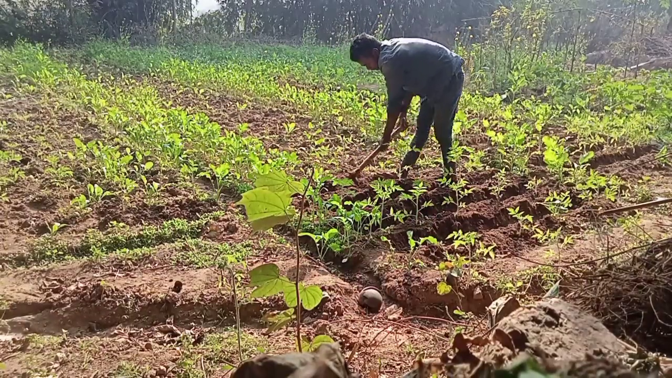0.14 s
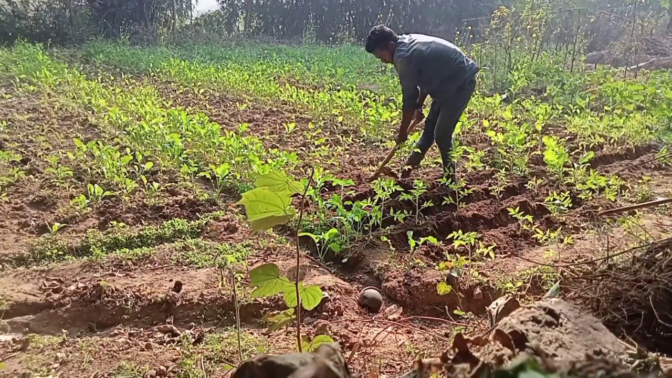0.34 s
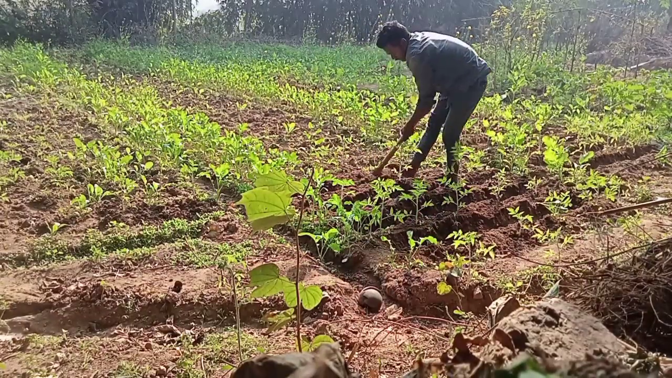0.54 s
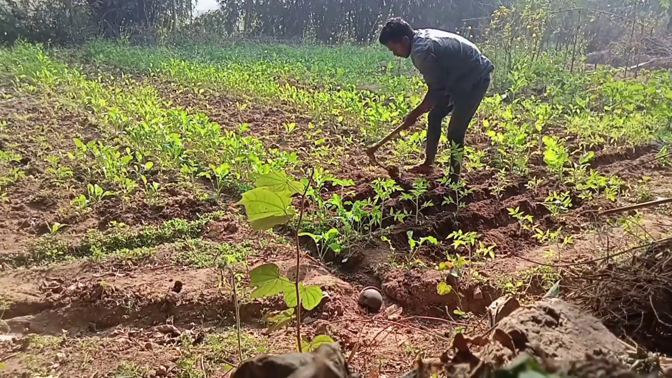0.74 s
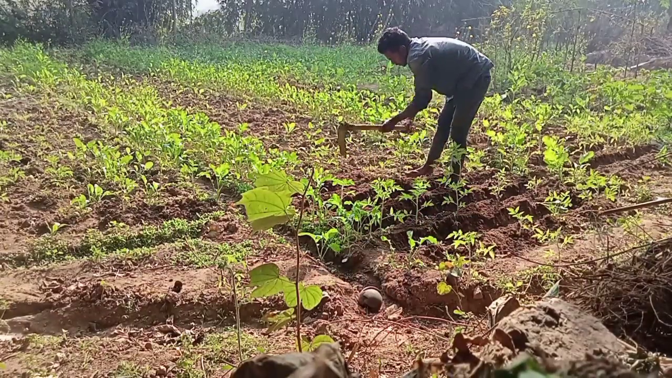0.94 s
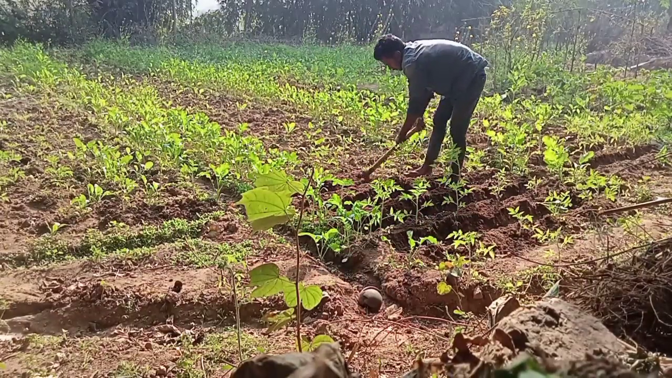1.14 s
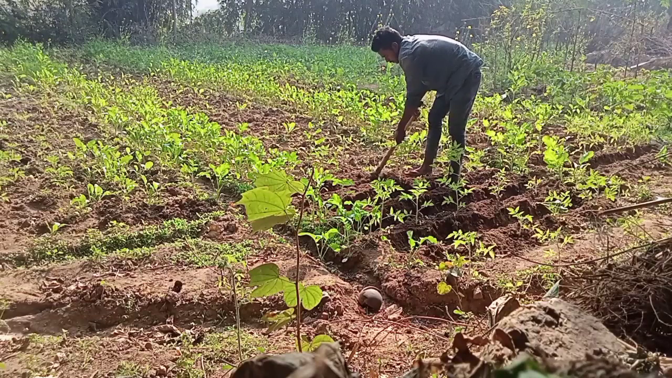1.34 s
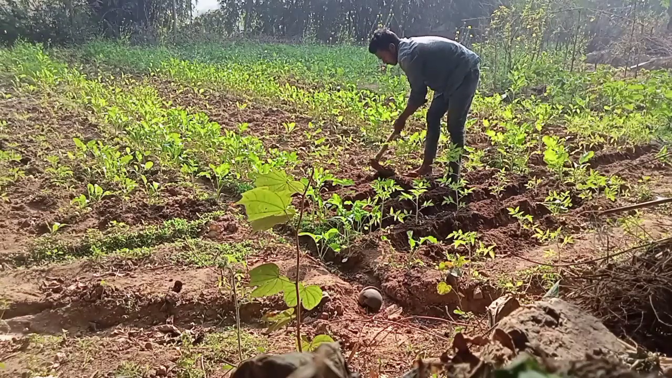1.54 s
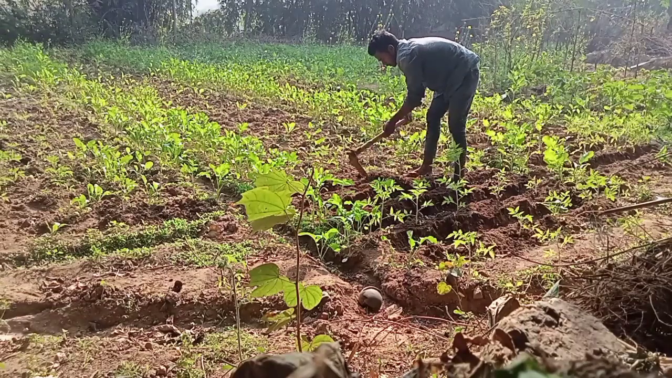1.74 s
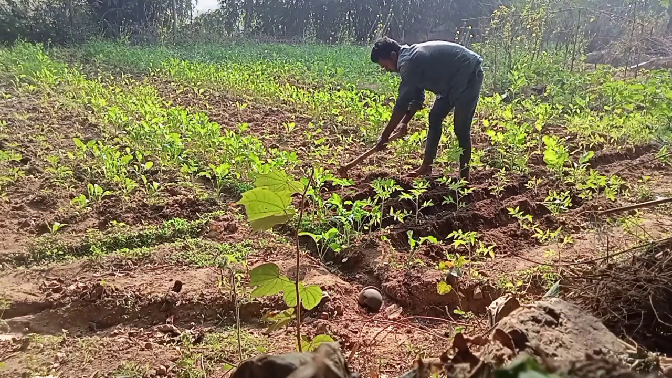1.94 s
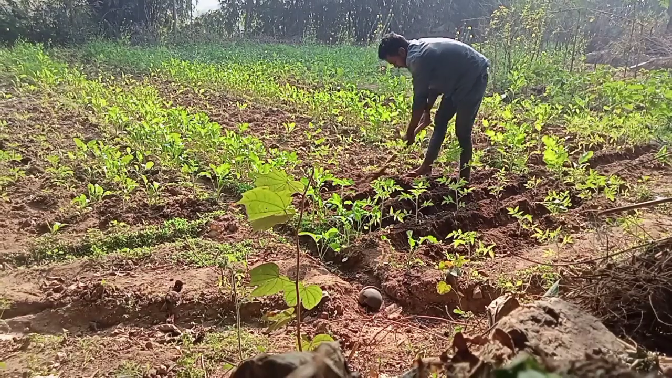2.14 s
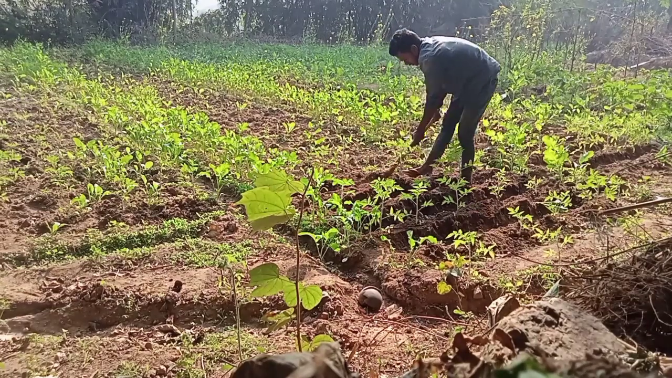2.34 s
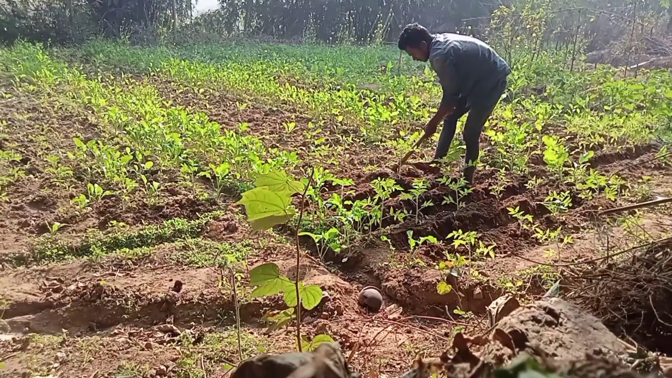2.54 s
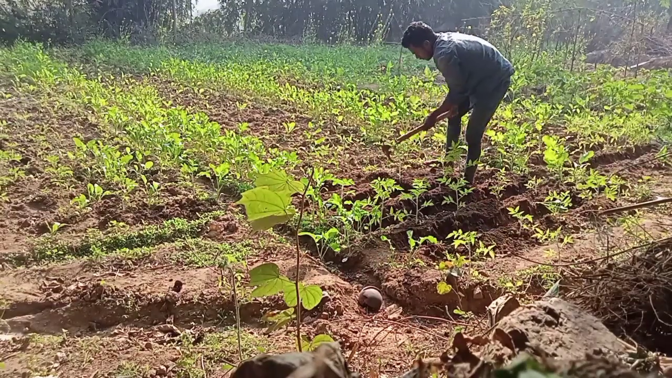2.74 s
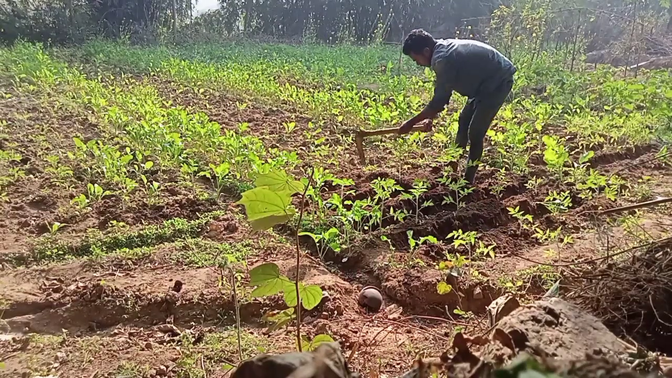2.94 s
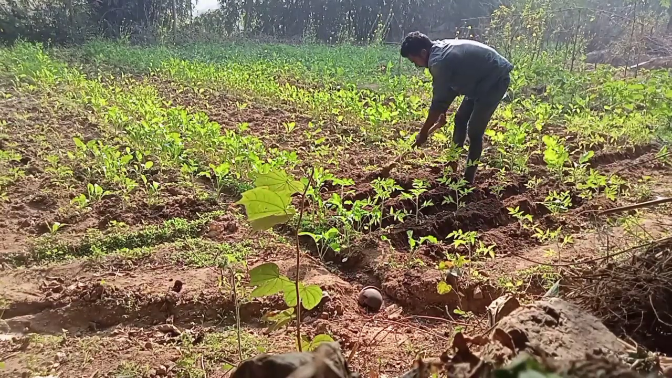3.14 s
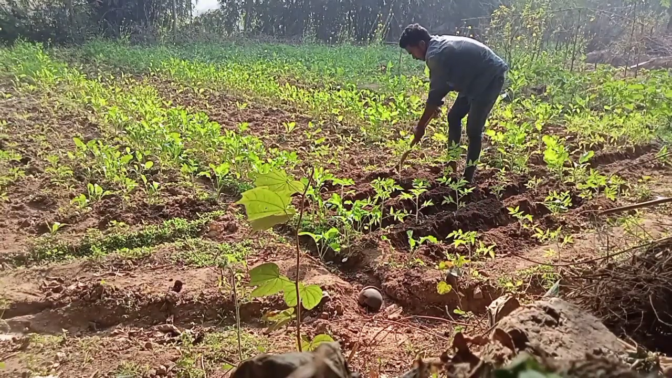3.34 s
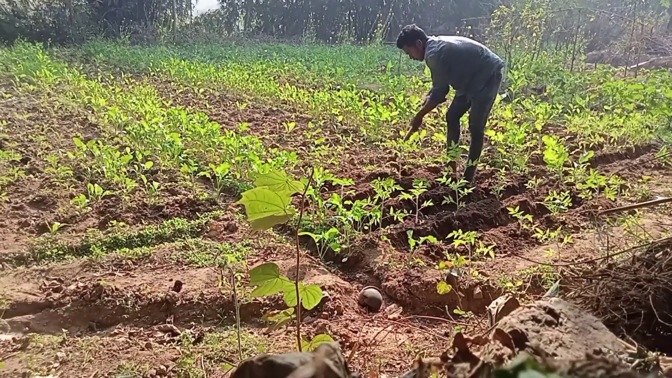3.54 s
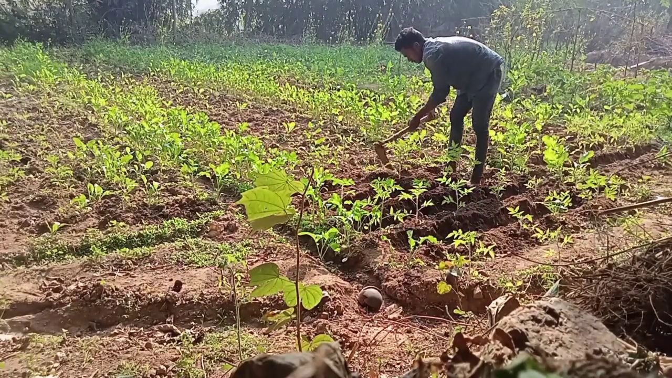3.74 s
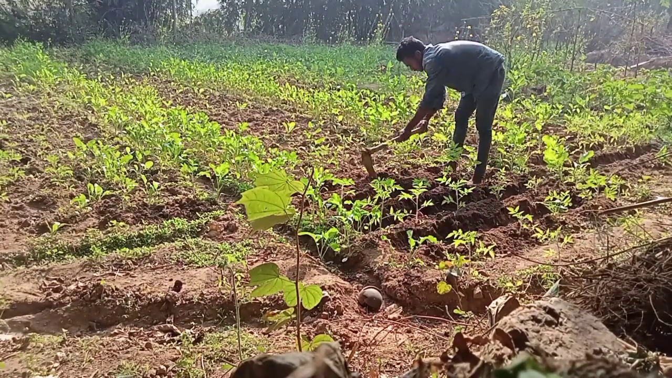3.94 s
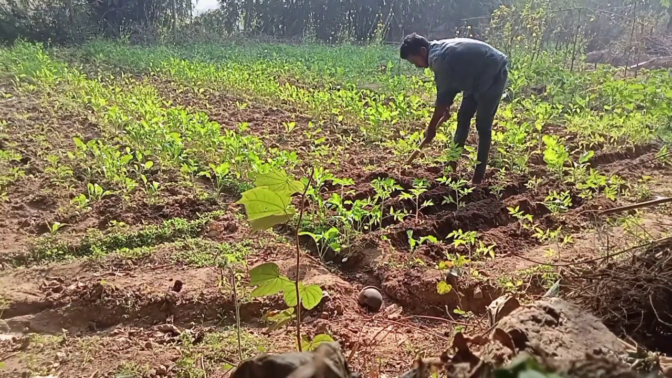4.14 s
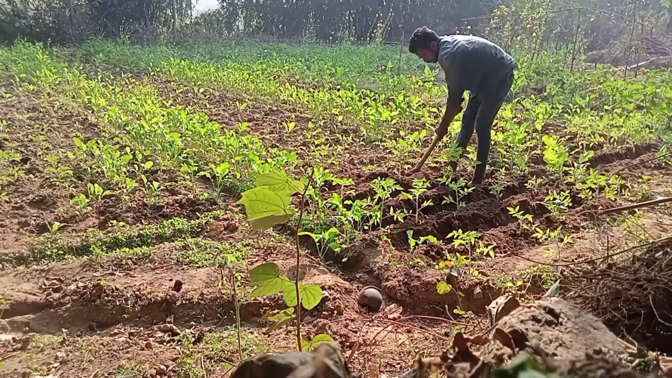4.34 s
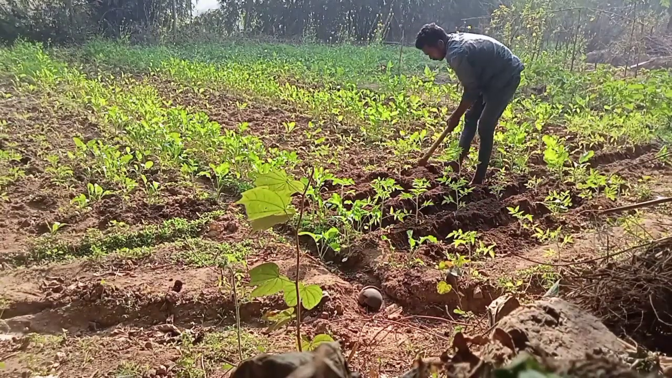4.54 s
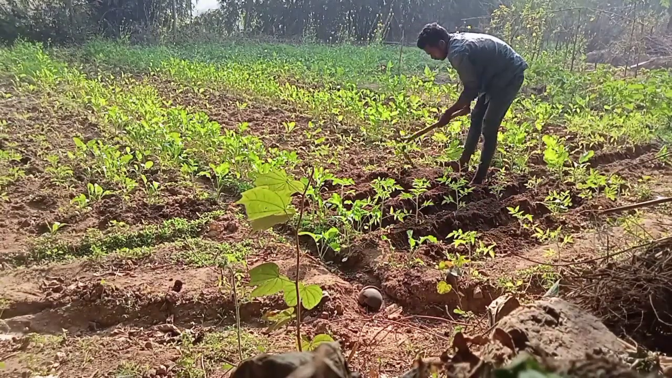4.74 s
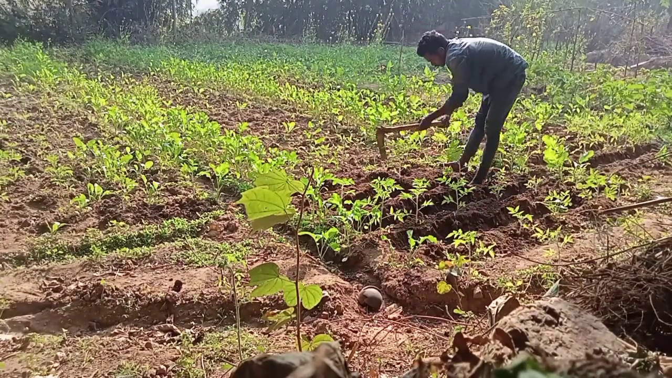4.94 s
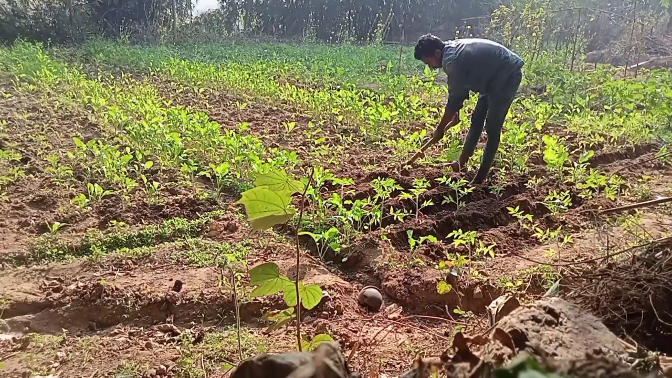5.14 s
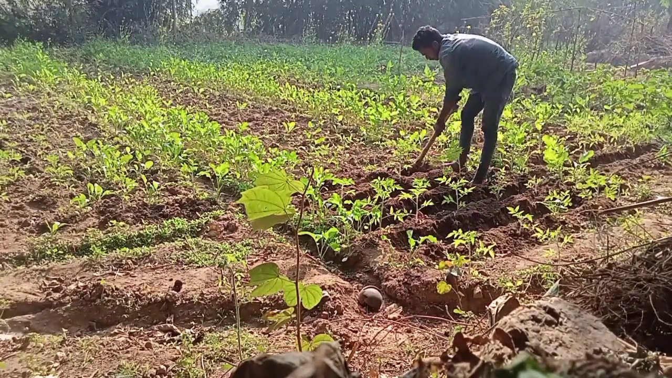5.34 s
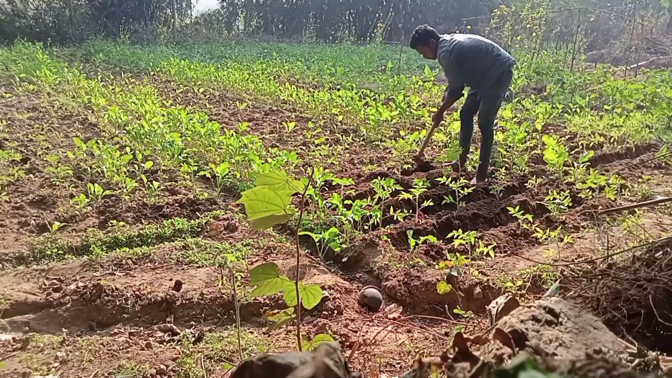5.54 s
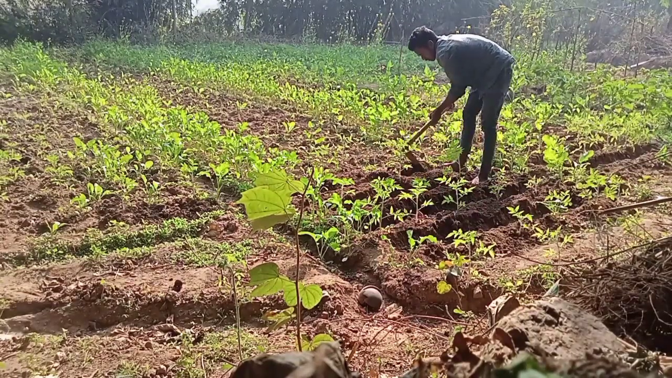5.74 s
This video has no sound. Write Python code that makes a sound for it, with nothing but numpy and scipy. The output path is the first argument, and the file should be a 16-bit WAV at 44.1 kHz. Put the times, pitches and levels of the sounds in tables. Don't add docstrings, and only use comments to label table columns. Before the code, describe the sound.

A phone microphone a few metres away hears a hoe working dry, stony soil in an open field. From 0 to 0.4 seconds the blade makes a long, rough, uneven drag with several thuds. A sharp chop lands near 1.2, a light, brighter double scrape at 2.05-2.2, a hard chop at 3.17, a chop and drag with much crumbling at 4.1-4.25, and a deep, bright, dusty chop at 5.17. Steel grates briefly, damped by earth; clods crumble and crumbs tick on stone. Crickets chirp in quick small phrases over cicada hiss and soft rumble. Faint birds whistle and chip: a sinking whistle at 0.55, a buzzy chip at 2.83. Leaves brush softly between strokes, longest around 3.95. A dove coos faintly from 4.3. Distant wooden knocks grow at 5.5, 5.7 and 5.8, beside a clear rising whistle at 5.7-5.8. Faint echoes return off trees.

```python
import sys
import numpy as np
from scipy import signal
from scipy.fft import rfft, irfft, next_fast_len
from scipy.io import wavfile
from scipy.ndimage import uniform_filter1d, map_coordinates

SR = 44100
rng = np.random.default_rng(int(sys.argv[2]) if len(sys.argv) > 2 else 0)


def magnitude_from_level(level_db):
    exponent = np.asarray(level_db, float) / 20
    return 10 ** exponent


def int16_out(signal):
    q = np.round(np.clip(np.atleast_2d(signal).T, -1, 1) * 32767)
    wavfile.write(sys.argv[1], SR, q.astype(np.int16))


N = 259749
T = np.arange(N) / SR

# (frequency [Hz], density [dB per Hz])
SPRAY = [(6000, -19), (9000, 19), (12000, -6), (14500, 10), (16000, 7)]
GRIT_DB, FIRM_DB = -4, -50
REST = 10 ** ((FIRM_DB + GRIT_DB) / 20)
LOW_MODES, UPPER_MODES, SOIL, DUST, CRUST, LOWEST_MODE, EDGE_MODE = range(7)


def unit(x):
    return x / np.sqrt(np.mean(x ** 2) + 1e-20)


def along(points, hz):
    f, v = np.transpose(points)
    return np.interp(np.log(hz + 1), np.log(f + 1), v)


def wobble(rate):
    coarse = T[::16]
    knots = rng.standard_normal(int(N * rate / SR) + 4)
    return np.interp(T, coarse, map_coordinates(knots, [coarse * rate]))


def filtered(x, response):
    m = next_fast_len(N + SR // 2)
    return irfft(rfft(x, m) * response(np.fft.rfftfreq(m, 1 / SR)), m)[:N]


def coloured(x, spectrum):
    return filtered(x, lambda hz: magnitude_from_level(along(spectrum, hz)))


def rush(spectrum, patchy_db):
    z = signal.stft(rng.standard_normal(N + 512), nperseg=512)[2]
    patches = uniform_filter1d(rng.standard_normal(z.shape), 6, 0)
    patches = unit(uniform_filter1d(patches, 14, 1))
    noise = signal.istft(z * magnitude_from_level(patchy_db * patches), nperseg=512)[1][:N]
    return unit(coloured(noise, spectrum))


def grit(per_second, spread_db):
    hit = rng.random(N) < per_second / SR
    size = magnitude_from_level(spread_db * np.minimum(rng.exponential(size=N), 3))
    return unit(hit * rng.standard_normal(N) * size)


def add(track, s, sound):
    place = track[round(s * SR):][:len(sound)]
    place += sound[:len(place)]


def air():
    # (time [s], level [dB])
    swell = [(0.0, -56.5), (0.75, -66.5), (1.28, -65), (1.82, -67), (2.18, -61.5), (2.36, -65), (4.02, -66),
             (4.26, -63), (4.67, -66.5), (5.89, -64.5)]
    # (frequency [Hz], density [dB per Hz])
    rumble_band = [(25, -16), (45, -0.5), (75, 8.5), (110, 7.5), (180, -2.5), (300, -11), (500, -44.5)]
    field_band = [(150, -5), (400, -0.5), (1000, -4.5), (2000, -6), (4000, -11), (6200, -17.5), (8500, -36),
                  (9500, -48), (11000, -72)]
    cicada_band = [(4100, -9), (4500, 6.5), (5000, -8), (6300, -12.5), (7200, 3.5), (8100, -1.5),
                   (9000, -17.5), (10000, -51)]
    hiss_band = [(6000, -39), (9000, 1.5), (12000, 2), (15000, 9), (16000, -3)]
    swell_db = np.interp(T, *np.transpose(swell))
    field_db = -69 + 0.96 * (swell_db - swell_db.mean())
    cicada_db = -76.5 + 1.2 * wobble(1.5) + 0.33 * wobble(13)
    rumble = magnitude_from_level(swell_db + 2.5 + 1.2 * wobble(9)) * rush(rumble_band, patchy_db=1.5)
    field = magnitude_from_level(field_db) * rush(field_band, patchy_db=2.26)
    cicadas = magnitude_from_level(cicada_db) * rush(cicada_band, patchy_db=1.8)
    return rumble + field + cicadas + magnitude_from_level(-100.5) * rush(hiss_band, patchy_db=1.5)


def spans(grows, column=None):
    # (time [s], pressure [dB])
    strokes = [
        [(0, -57.5), (.035, -49.5), (.062, -38.5), (.105, -47.5), (.14, -39), (.235, -48.5), (.272, -45),
         (.36, -57.5), (.46, -97)],
        [(1.16, -76), (1.17, -44.5), (1.19, -33), (1.232, -44), (1.252, -51.5), (1.27, -51.5), (1.35, -64),
         (1.43, -80)],
        [(2.034, -79), (2.043, -49.5), (2.064, -55), (2.078, -41.5), (2.112, -52.5), (2.17, -49.5),
         (2.194, -47), (2.3, -63.5), (2.42, -85)],
        [(3.141, -69), (3.149, -67), (3.18, -33.5), (3.2, -45), (3.26, -56.5), (3.282, -54.5), (3.32, -67.5),
         (3.42, -79)],
        [(4.091, -70), (4.098, -58), (4.109, -58), (4.113, -40), (4.17, -40.5), (4.186, -51), (4.212, -47.5),
         (4.338, -64), (4.45, -72)],
        [(5.158, -66), (5.168, -45), (5.18, -39), (5.2, -45), (5.225, -50.5), (5.28, -56.5), (5.36, -69.5),
         (5.42, -69)],
    ]
    # (low modes [dB], upper modes [dB], crumbling soil [dB], fine dust [dB],
    # dry crust [dB], lowest mode [dB], edge mode [dB])
    grounds = [
        (-9, -1, 3, -26, -1.5, 1, -6),
        (-11, 1.5, 3.5, -20, -1, 0, -3),
        (-2, 4.5, 3, -16.5, 0, 4, 11),
        (0.5, 1.5, -1.5, -26, 1, -0.5, 0),
        (-2, 3, 5.5, -19, 0, 0, -3),
        (0.5, 8.5, 3, -13, 1.5, -6, 0),
    ]
    gain = np.zeros(N)
    for rows, ground in zip(strokes, grounds):
        s, db = np.transpose(rows)
        fade = np.clip((s[-1] - T) / .05, 0, 1) * (T >= s[0])
        shift_db = 0 if column is None else ground[column]
        swing_db = grows * (np.interp(T, s, db) - FIRM_DB)
        gain += fade * magnitude_from_level(FIRM_DB + GRIT_DB + swing_db + shift_db)
    return gain


def steel(x, band):
    def response(f):
        total = 0
        for k, (centre, width, db) in enumerate(np.maximum(band, [0, 95, -99])):
            total = total + (-1) ** k * magnitude_from_level(db) * 1j * f * width / (centre ** 2 - f ** 2 + 1j * f * width)
        return total
    return filtered(x, response)


def blade():
    # (time [s], peak [dB],
    # share of low modes [dB], share of upper modes [dB])
    stones = [(0.0334, -52, -7, -16), (0.052, -39, -11, -26), (0.087, -33, -30, -41), (0.133, -49, -9, -15),
              (0.16, -48, -9, -23), (0.196, -57, -8, -8), (0.25, -63, -7, -13), (0.2701, -35, -6, -33),
              (0.286, -52, -4, -11), (0.305, -52, -3, 2), (0.331, -52, -3, -1), (0.353, -57, -3, 2),
              (0.504, -61.5, 6, 8), (1.1707, -44, 13.5, -20), (1.1861, -35, -6, -20), (1.249, -33, -7, -31),
              (1.292, -53, 4, -7), (1.314, -68, -2, -3), (2.038, -52, -11, -13), (2.0703, -46, 2, -13),
              (2.133, -47, -15.5, -16), (2.154, -46, -14, -4), (2.185, -59, 1, 18), (2.231, -67, 2, -5),
              (2.272, -68, -2, 0), (2.556, -49.5, -8, -10), (3.1475, -41, 0, 1), (3.1608, -45, -13, -1),
              (3.174, -40, 8, -14), (3.215, -59, 0, -9), (3.27, -62, 11, -4), (3.295, -64, 0, -3),
              (4.096, -53.5, -8, 14.5), (4.1092, -31.5, 2.5, 12), (4.1365, -38, -3, 8),
              (4.1639, -36.5, 1, -6), (4.19, -52, 1, -2), (4.214, -46, 12.5, -14), (4.226, -69, 6, -17),
              (4.251, -64, 0, -14), (4.276, -61, -3, -3), (4.322, -67, -4, -6), (5.1673, -49, 9, -12),
              (5.174, -37, 13.5, -19), (5.1773, -54, -2, -8), (5.191, -52, -7, 16), (5.235, -56, 0, -7),
              (5.274, -58, 0, 6)]
    # (frequency [Hz], width [Hz], level [dB])
    modes = [(1005, 55, -5), (1595, 134, -7.5), (1820, 115, -1), (2502, 160, -0.5), (2610, 99, 6),
             (2930, 120, -11), (3654, 87, -4), (3853, 120, -7), (4054, 100, -10), (5110, 140, -12),
             (5540, 71, -11.5), (7100, 1200, -22), (8460, 62, -16)]
    # (frequency [Hz], density [dB per Hz])
    scrape = [(350, -34), (800, -29.5), (1400, -11), (2500, -4.5), (4000, -11), (6000, -21), (7500, -13),
              (9500, -33.5), (12000, -100)]
    # (frequency [Hz], level [dB])
    contact = [(8500, 0), (11000, -8), (16000, -14)]

    def lumps():
        return magnitude_from_level(-6 + 3 * wobble(60) + 2 * wobble(200))

    low = spans(0.72, LOW_MODES) * lumps()
    mid = spans(0.91) * lumps()
    high = spans(0.99, UPPER_MODES) * lumps()
    grains = grit(8000, spread_db=-2.0) + magnitude_from_level(-14.5) * grit(400, spread_db=1.5)
    blows, sparks = coloured(grains, contact), np.zeros(N)
    t = T[:SR // 8]
    for s, db, low_db, high_db in stones:
        burst = magnitude_from_level(db - 8 - 60 * t / 0.049)
        add(low, s, burst * magnitude_from_level(low_db))
        add(mid, s, burst)
        add(high, s, burst * magnitude_from_level(high_db))
        add(sparks, s, burst * magnitude_from_level(high_db))
        add(blows, s + .0006, np.array([9.]))
    ring = magnitude_from_level(19) * steel(blows * low, modes[1:3])
    ring += magnitude_from_level(15.5) * steel(blows * mid * spans(0, LOWEST_MODE) / REST, modes[:1])
    ring += magnitude_from_level(15.5) * steel(blows * mid, modes[3:5])
    ring += magnitude_from_level(14) * steel(blows * mid * spans(0, EDGE_MODE) / REST, modes[5:6])
    ring += magnitude_from_level(18.5) * steel(blows * high, modes[6:])
    rasp_gain = np.sqrt(mid * high) + magnitude_from_level(-12.5) * spans(0.53)
    rasp = unit(coloured(grit(12000, spread_db=-0.5), scrape)) * rasp_gain
    dust = rush(SPRAY, patchy_db=5) * (spans(1.35, DUST) + magnitude_from_level(-29) * sparks)
    return coloured(ring, contact) + rasp + dust


def soil():
    # (time [s], peak [dB], pitch [Hz], ring [times the usual])
    thuds = [(0.059, -28.5, 302, 0.76), (0.128, -39, 240, 0.97), (0.188, -36, 244, 0.84),
             (0.242, -35, 238, 1.03), (0.281, -42, 302, 0.96), (1.187, -28.5, 165, 1.55),
             (1.179, -30, 262, 1.55), (1.247, -34.5, 140, 0.97), (2.044, -45, 350, 1.1),
             (2.07, -37, 230, 0.95), (2.142, -44.5, 383, 1.14), (2.188, -32.5, 306, 0.83),
             (3.168, -32, 248, 1.34), (3.178, -27.5, 110, 0.94), (3.269, -36.5, 199, 0.67),
             (4.112, -40.5, 367, 1.3), (4.138, -32, 145, 1.2), (4.202, -40, 142, 1.1),
             (4.389, -52.5, 304, 0.99), (4.484, -49, 109, 1.3), (4.683, -47, 133, 1.1),
             (5.174, -26, 124, 1.16), (5.178, -33, 354, 1.18), (5.227, -40, 173, 1.05)]
    # (frequency [Hz], density [dB per Hz])
    clod_band = [(40, -49), (90, 1), (160, 1), (280, -1), (400, -4), (520, -36.5)]
    crust_band = [(300, -27), (450, 5), (700, 3), (1100, -4), (1400, -15), (1800, -32)]
    out, crumbs, t = np.zeros(N), spans(0.63, SOIL), T[:SR // 4]
    for s, db, hz, rings in thuds:
        t60 = rings * 0.043 * (200 / hz) ** 0.2
        crumble = magnitude_from_level(db - 7.5 - 60 * t / 0.051)
        add(crumbs, s, crumble * (1 - np.exp(-t / 0.00099)) ** 2)
        sag = 1 - 0.15 * (1 - np.exp(-t / 0.029))
        turn = 2 * np.pi * hz * np.cumsum(sag) / SR
        push = np.sin(turn) + 0.41 * np.sin(0.61 * turn + rng.uniform(0, 7.6))
        add(out, s, magnitude_from_level(db + 10 - 60 * t / t60) * (1 - np.exp(-t / 0.0034)) ** 2 * push)
    lumps = magnitude_from_level(-6 + 3.5 * wobble(55))
    crust = magnitude_from_level(-8) / REST * spans(0, CRUST) * rush(crust_band, patchy_db=2)
    heard = filtered(out, lambda f: (1j * f / (1j * f + 60)) ** 2)
    return heard + crumbs * lumps * (rush(clod_band, patchy_db=2) + crust)


def crickets():
    # (first phrase [s], last phrase [s], period [s], pitch [Hz], chirps a phrase [count],
    # chirps apart [s], first chirp lasts [s], later chirps last [s])
    runs = [
        (.328, 1.128, .2, 5680, 2, .054, .032, .058),
        (1.322, 1.52, .198, 5720, 2, .049, .036, .05),
        (1.765, 2.561, .199, 5715, 2, .054, .036, .05),
        (.46, 4.335, .1937, 5550, 2, .049, .036, .04),
        (4.856, 5.83, .195, 5540, 2, .048, .036, .04),
        (1.43, 5.85, .2105, 5320, 3, .036, .042, .042),
        (4.435, 5.606, .195, 6110, 2, .05, .038, .038),
    ]
    levels = [-69.5, -69.5, -68, -74, -75, -75.5, -79]
    out, shake = np.zeros(N), .7 * wobble(250)
    for (first, last, period, hz, chirps, apart, *lasts), db in zip(runs, levels):
        for start in np.linspace(first, last, round((last - first) / period) + 1):
            for k in range(chirps):
                s, length = start + apart * k, lasts[k > 0]
                t = T[:round(length * SR)] - length / 2
                size, detune, late = rng.standard_normal(3)
                strokes = 1 + .4 * np.cos(2 * np.pi * 110 * t + late)
                jitter = np.resize(shake[round(s * SR):], len(t))
                tone = np.sin(2 * np.pi * hz * (1 + 0.005 * detune - 0.15 * t) * t + jitter)
                swell = magnitude_from_level(db + 2.5 + 1.8 * size) * np.cos(np.pi * t / length)
                add(out, s - length / 2 + 0.001 * late, swell * strokes * tone)
    return out


def ticks():
    # (time [s], peak [dB], pitch [Hz])
    crumbs = [
        (0.34, -54, 800),
        (5.174, -39, 620),
        (3.174, -48, 1330),
        (4.3, -52.5, 450),
        (2.075, -43, 890),
    ]
    out, t = np.zeros(N), T[:SR // 10]
    for s, db, hz in crumbs:
        sos = signal.butter(3, [hz / 1.45, hz * 1.45], "band", fs=SR, output="sos")
        puff = unit(signal.sosfilt(sos, rng.standard_normal(len(t))))
        add(out, s, magnitude_from_level(db - 60 * t / 0.052) * (1 - np.exp(-t / 0.00067)) ** 2 * puff)
    return out


def leaves():
    # (middle [s], length [s], body [dB], hiss [dB])
    rustles = [
        (0.52, 0.06, -76, -92),
        (1.501, 0.033, -71, -76),
        (2.587, 0.065, -73, -101),
        (2.69, 0.054, -87, -89),
        (2.8, 0.17, -78, -90),
        (3.429, 0.09, -69, -86),
        (3.952, 0.29, -70.5, -92),
        (5.067, 0.076, -77, -87),
    ]
    # (frequency [Hz], density [dB per Hz])
    leaf_band = [(300, -37), (700, -3), (2200, 5.5), (5000, -6), (8500, -18), (10000, -38)]
    body = unit(coloured(grit(3000, spread_db=.8), leaf_band))
    hiss = rush(SPRAY, patchy_db=.6)
    out = np.zeros(N)
    for s, length, db, hiss_db in rustles:
        out += np.exp(-(2 * (T - s) / length) ** 2) * (magnitude_from_level(db) * body + magnitude_from_level(hiss_db) * hiss)
    return out


def calls(notes, waver, waver_rate, flutter_db, settle, peak_at, fade_db):
    out = np.zeros(N)
    pitch = 1 + waver * wobble(waver_rate)
    size = magnitude_from_level(5.5 + flutter_db * wobble(waver_rate))
    for s, length, first_hz, last_hz, db in notes:
        bend = pitch[round(s * SR):][:round(length * SR)]
        u = T[:len(bend)] / length
        hz = first_hz + (last_hz - first_hz) * np.expm1(-settle * u) / np.expm1(-settle)
        away = np.maximum((peak_at - u) / peak_at, (u - peak_at) / (1 - peak_at))
        edge = np.clip(np.minimum(u, 1 - u) * length / .015, 0, 1)
        add(out, s, edge * magnitude_from_level(db - fade_db * away) * np.sin(2 * np.pi * np.cumsum(hz * bend) / SR))
    return out * size


def birds():
    # (start [s], length [s], first pitch [Hz], last pitch [Hz], peak [dB])
    sinking = [
        (.553, .38, 3800, 2700, -66),
        (.52, .1, 3950, 3750, -73),
        (.55, .12, 4300, 3750, -74),
    ]
    falls = [
        (1.545, .125, 3350, 3020, -74),
        (1.868, .05, 4050, 2600, -70),
        (5.725, .2, 4100, 3720, -65),
        (1.35, .15, 3150, 4200, -71),
        (1.752, .08, 2900, 4300, -70),
    ]
    slides = [
        (.74, .22, 3650, 3430, -77.5),
        (4.31, .29, 4050, 3180, -70),
        (3.595, .125, 6740, 6780, -71),
        (3.615, .045, 7750, 7550, -71),
        (1.895, .085, 2600, 2880, -72),
    ]
    husky = [
        (.7, 0.088, 2000, 2140, -71.5),
        (1.9, 0.12, 1984, 1940, -73),
        (2.74, 0.23, 1820, 1930, -73),
        (3.86, 0.18, 1850, 1860, -73),
        (3.9, 0.16, 2350, 2386, -71),
        (5.11, 0.062, 3970, 6600, -68),
    ]
    chips = [
        (.935, 0.063, 6080, 6060, -70.5),
        (.958, 0.042, 6550, 6450, -71),
        (1.545, 0.077, 6100, 6230, -72),
        (2.828, 0.068, 6490, 6060, -63),
        (2.83, 0.029, 5900, 5750, -65),
        (3.555, 0.09, 5900, 6300, -69),
        (3.553, 0.074, 6800, 6500, -72),
        (4.03, 0.083, 5900, 6450, -69.5),
    ]
    dove = [
        (4.32, 0.43, 625.6, 605, -74.5),
        (5.02, 0.13, 605, 620, -72.5),
        (5.2, 0.52, 658, 641, -70.5),
        (5.7, 0.2, 654, 676, -69),
    ]
    out = calls(sinking, waver=.018, waver_rate=220, flutter_db=2.2, settle=2.1, peak_at=.1, fade_db=11)
    out += calls(falls, waver=.017, waver_rate=200, flutter_db=2, settle=3.5, peak_at=.16, fade_db=8)
    out += calls(slides, waver=.012, waver_rate=200, flutter_db=2, settle=.1, peak_at=.6, fade_db=6)
    out += calls(husky, waver=.055, waver_rate=200, flutter_db=2.5, settle=.6, peak_at=.6, fade_db=9)
    out += calls(chips, waver=.025, waver_rate=220, flutter_db=3.5, settle=.8, peak_at=.3, fade_db=10)
    out += calls(dove, waver=.14, waver_rate=130, flutter_db=2.5, settle=.6, peak_at=.4, fade_db=6)
    return out


def knocks():
    # (time [s], peak [dB], pitch [Hz])
    taps = [
        (5.493, -51.5, 1090),
        (5.692, -44, 1010),
        (5.806, -39.5, 980),
    ]
    out, t = np.zeros(N), T[:SR // 10]
    for s, db, hz in taps:
        ring = np.sin(2 * np.pi * hz * t) + 0.21 * np.sin(2 * np.pi * 0.49 * hz * t)
        add(out, s, magnitude_from_level(db + 4.5 - 60 * t / 0.017) * (1 - np.exp(-t / 0.0014)) * ring)
    return out


def rising_whistle():
    # (time [s], pitch [Hz], level [dB])
    climb = [(5.66, 3200, -85), (5.68, 3850, -68), (5.697, 4550, -58), (5.73, 5050, -59),
             (5.775, 5650, -60), (5.795, 6300, -57), (5.815, 6700, -62), (5.826, 7200, -72),
             (5.84, 7500, -88)]
    s, hz, db = np.transpose(climb)
    pitch = np.interp(T, s, hz) * (1 + .008 * wobble(150))
    level_db = np.interp(T, s, db + 4, -140, -140) + 1.5 * wobble(150)
    return magnitude_from_level(level_db) * np.sin(2 * np.pi * np.cumsum(pitch) / SR)


def trees(x):
    # (frequency [Hz], t60 [s])
    decay = [(300, 0.3), (3000, 0.28), (5500, 0.31), (9000, 0.25)]
    hz, t, z = signal.stft(rng.standard_normal(SR // 2), SR, nperseg=256)
    tail = signal.istft(z * magnitude_from_level(-60 * t / along(decay, hz)[:, None]), SR, nperseg=256)[1]
    return signal.fftconvolve(x, tail / np.linalg.norm(tail))[:N]


def scene():
    hoe = blade() + soil()
    insects, taps = crickets(), knocks()
    song = birds() + rising_whistle()
    echoes = trees(magnitude_from_level(-11.5) * hoe + magnitude_from_level(-4) * song + magnitude_from_level(-8.5) * insects + magnitude_from_level(-25) * taps)
    near = hoe + leaves() + ticks()
    return (near + magnitude_from_level(-4) * song + insects + taps + echoes + air())[None]


def low_pass(x):
    return signal.sosfilt(signal.butter(12, 15990, fs=SR, output="sos"), x)


def record(dry):
    def mic(hz):
        return (1j * hz / (1j * hz + 42)) ** 3 * (hz < 15520)
    return low_pass(filtered(dry[0], mic)[None])


dry = scene()
out = record(dry)
int16_out(out)
```